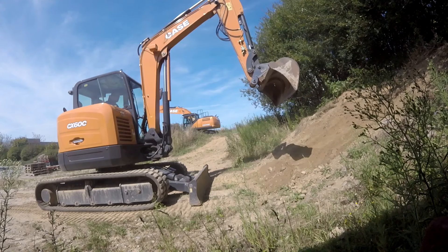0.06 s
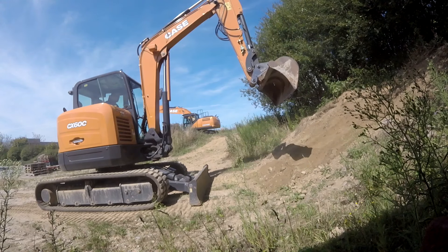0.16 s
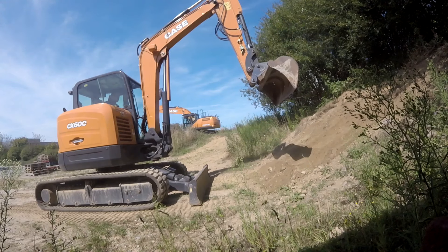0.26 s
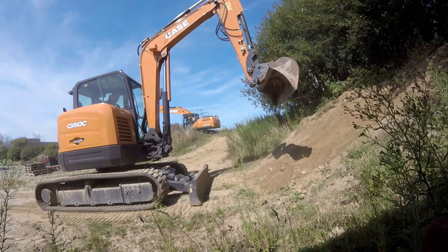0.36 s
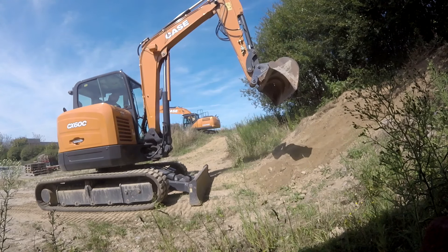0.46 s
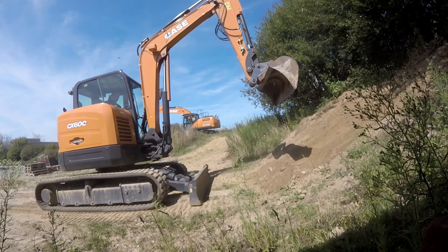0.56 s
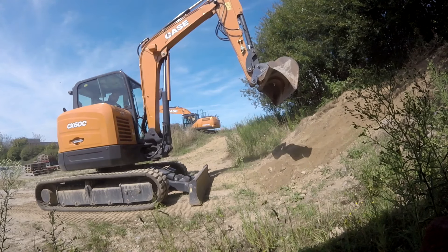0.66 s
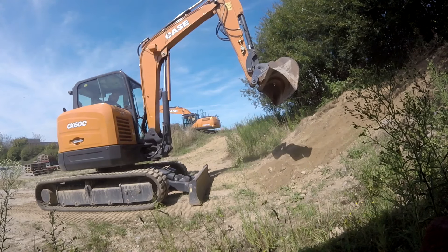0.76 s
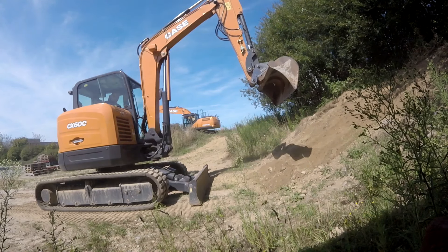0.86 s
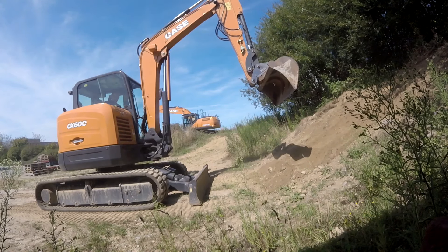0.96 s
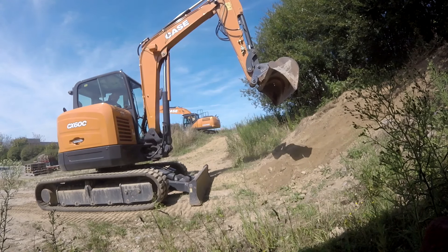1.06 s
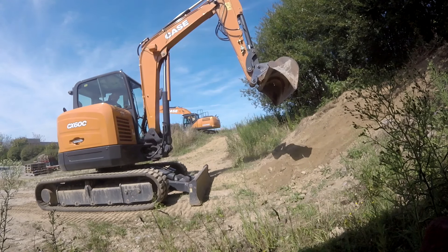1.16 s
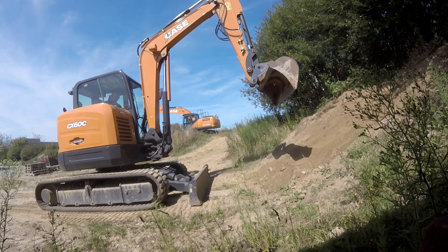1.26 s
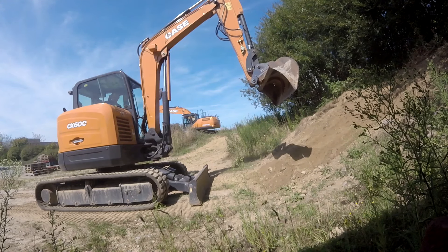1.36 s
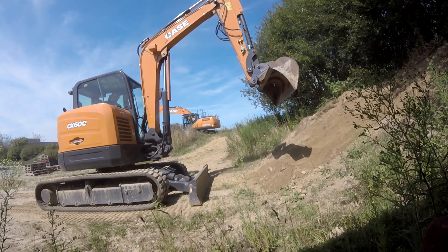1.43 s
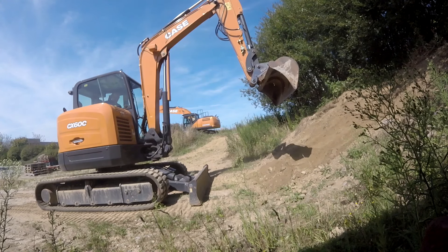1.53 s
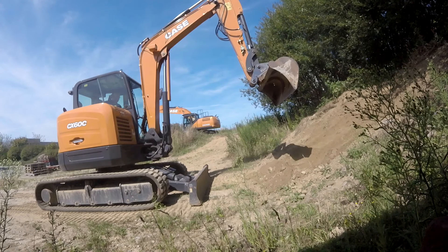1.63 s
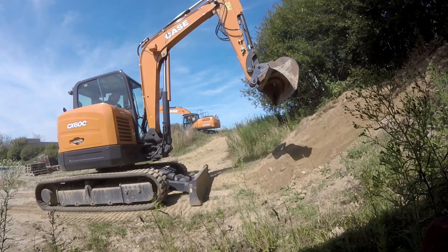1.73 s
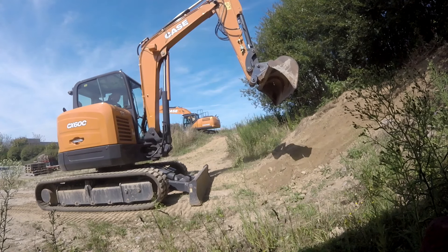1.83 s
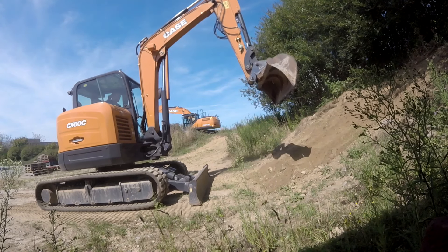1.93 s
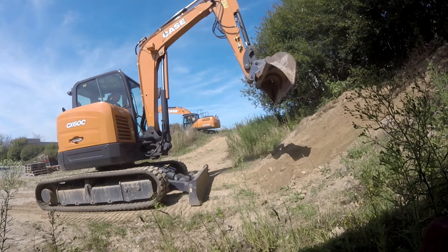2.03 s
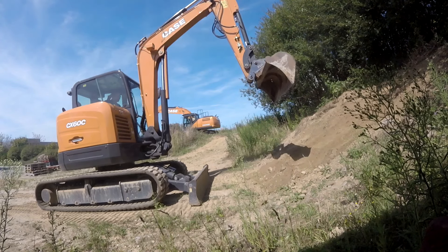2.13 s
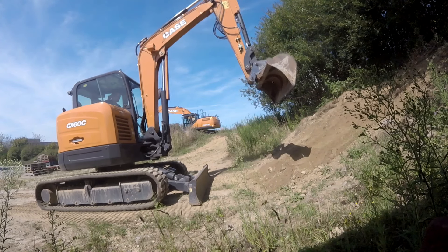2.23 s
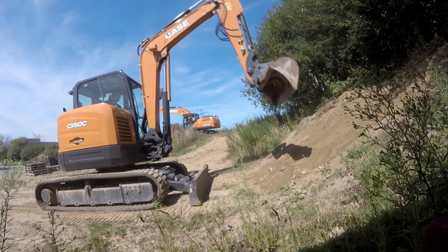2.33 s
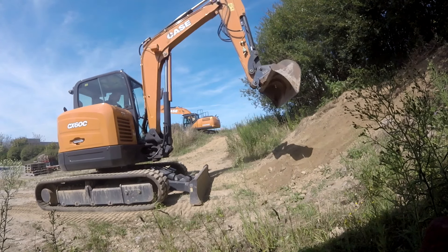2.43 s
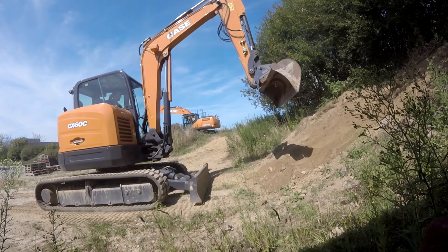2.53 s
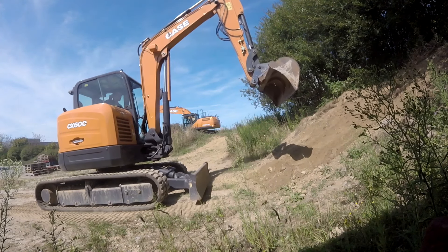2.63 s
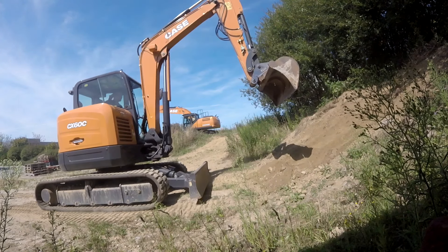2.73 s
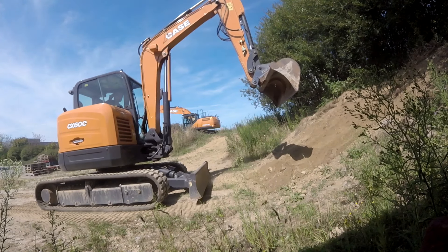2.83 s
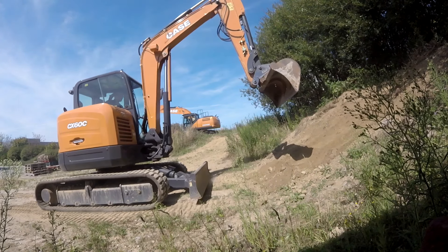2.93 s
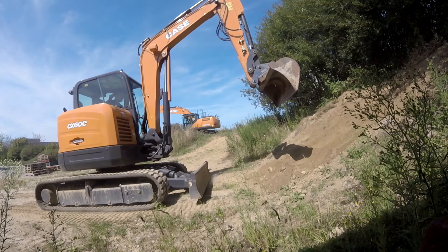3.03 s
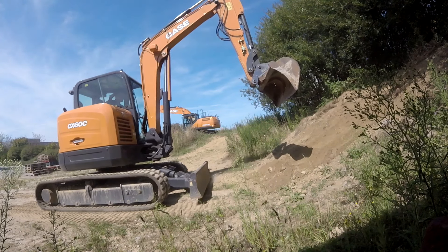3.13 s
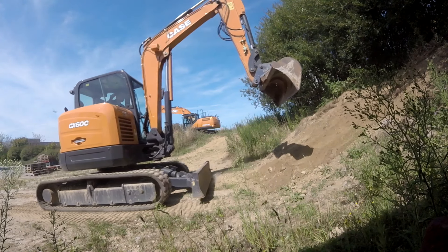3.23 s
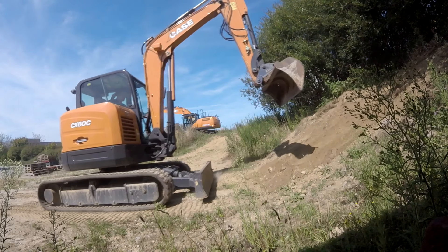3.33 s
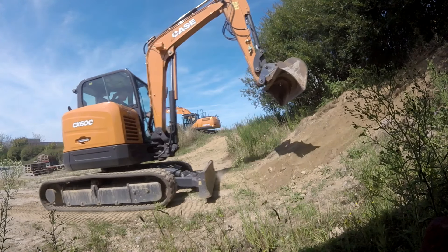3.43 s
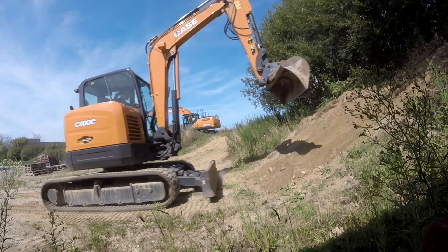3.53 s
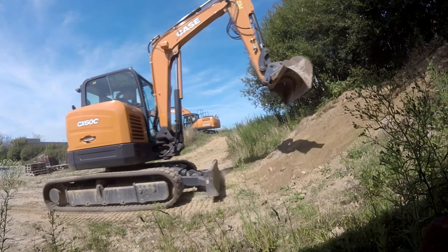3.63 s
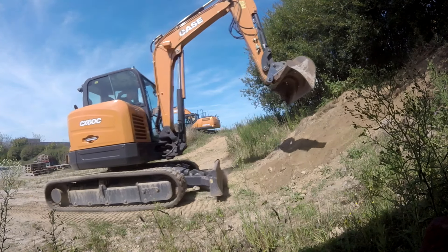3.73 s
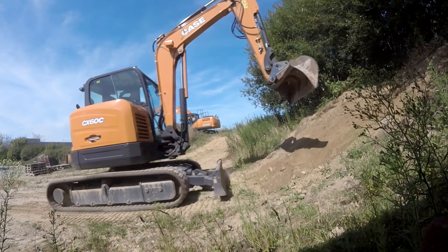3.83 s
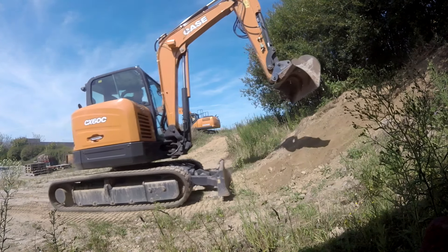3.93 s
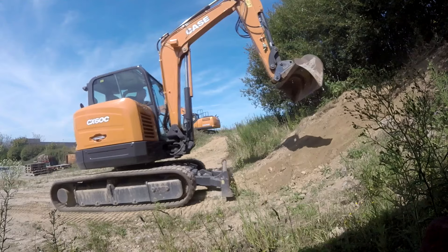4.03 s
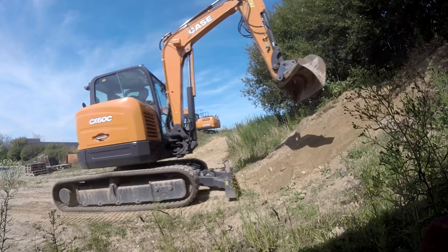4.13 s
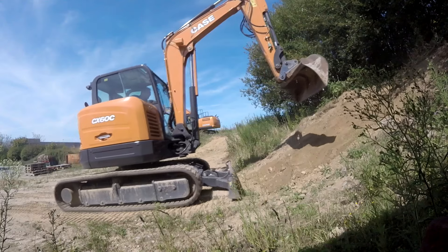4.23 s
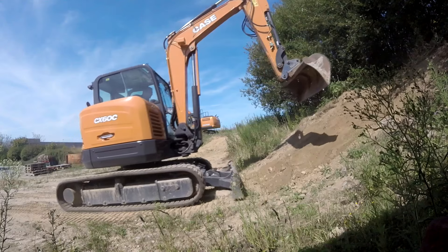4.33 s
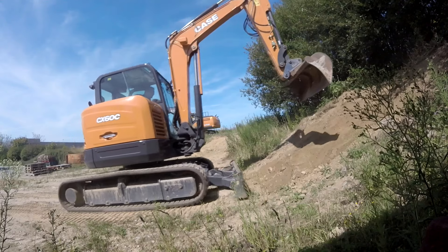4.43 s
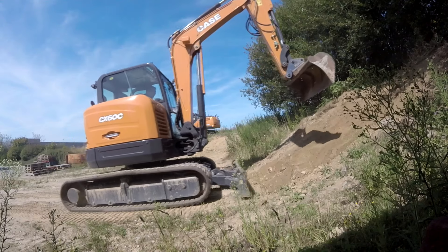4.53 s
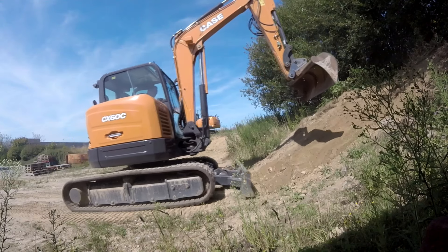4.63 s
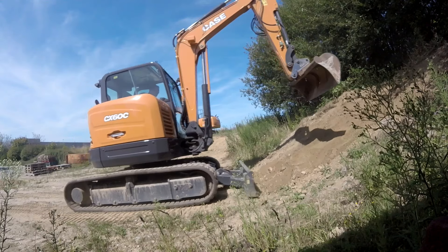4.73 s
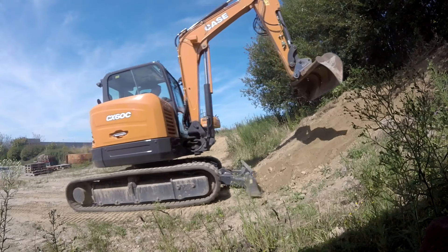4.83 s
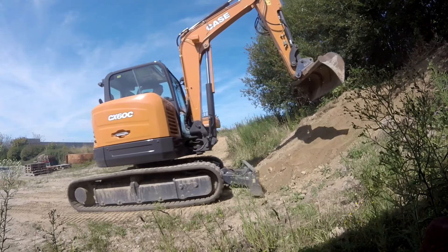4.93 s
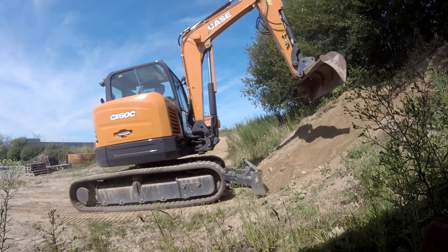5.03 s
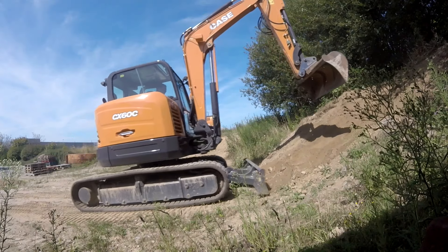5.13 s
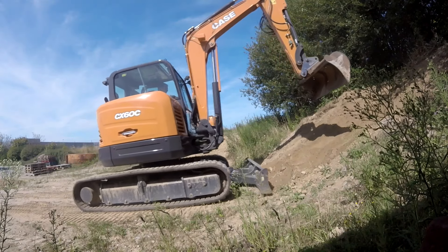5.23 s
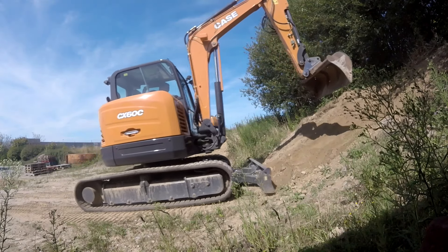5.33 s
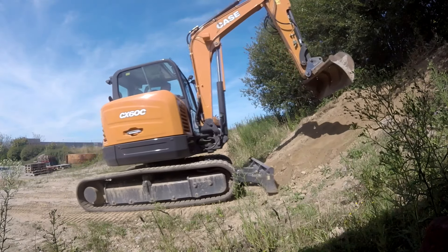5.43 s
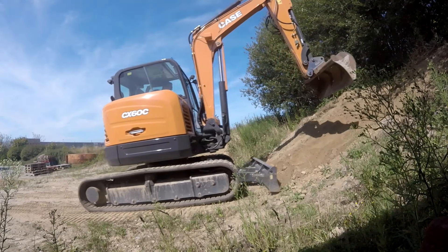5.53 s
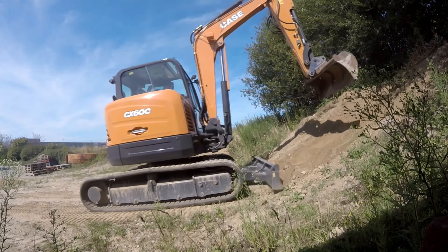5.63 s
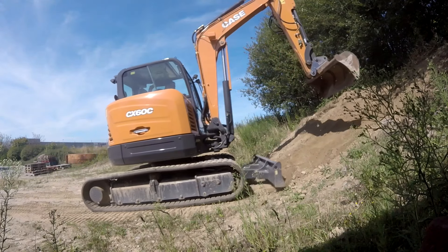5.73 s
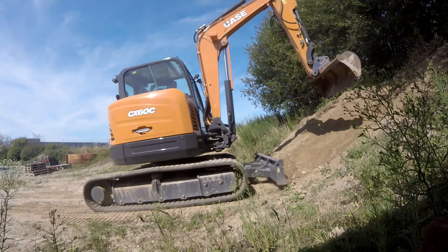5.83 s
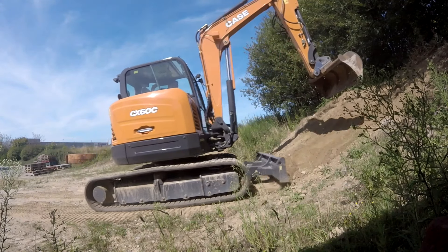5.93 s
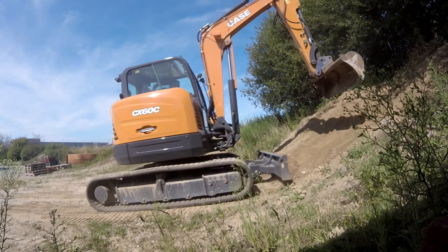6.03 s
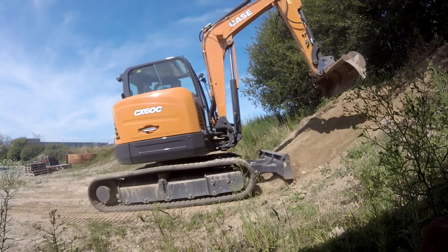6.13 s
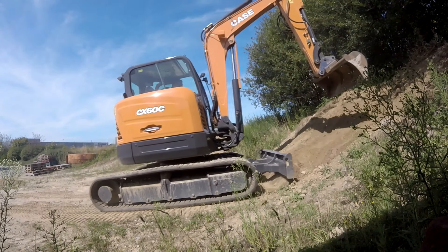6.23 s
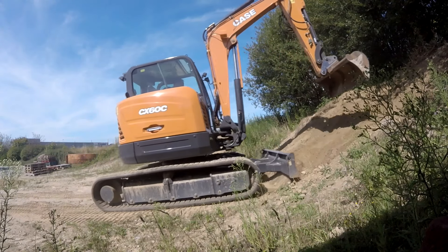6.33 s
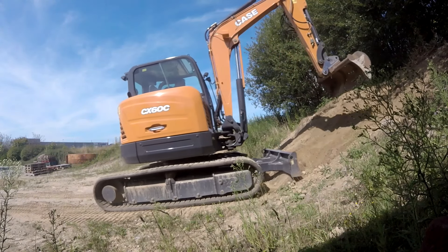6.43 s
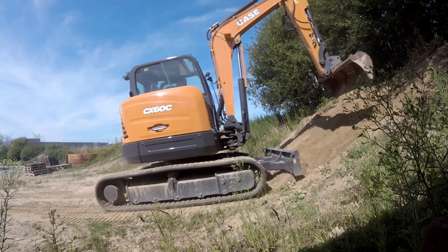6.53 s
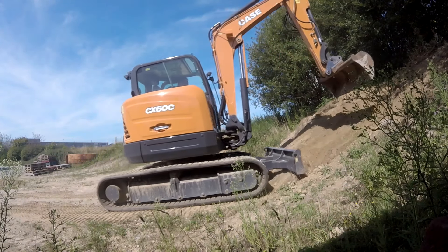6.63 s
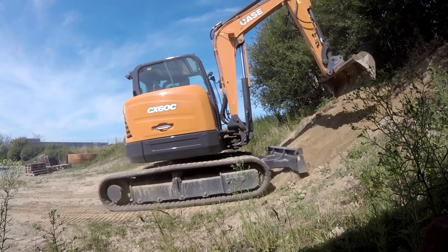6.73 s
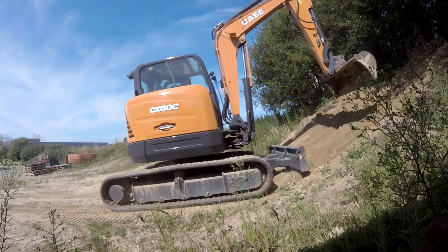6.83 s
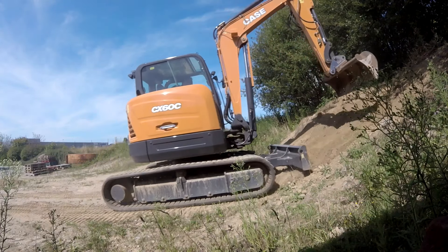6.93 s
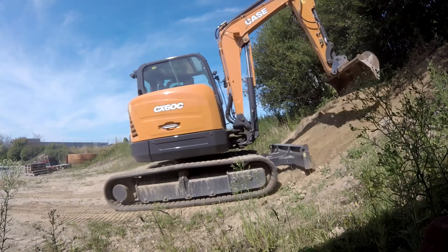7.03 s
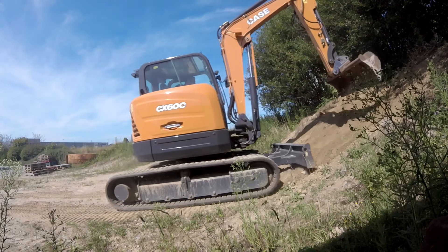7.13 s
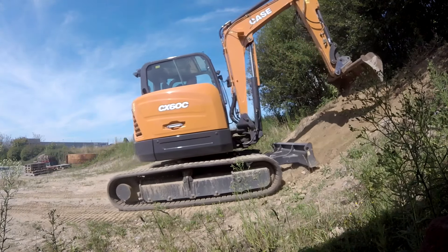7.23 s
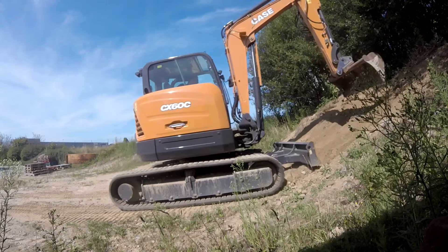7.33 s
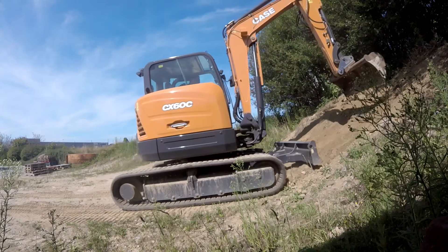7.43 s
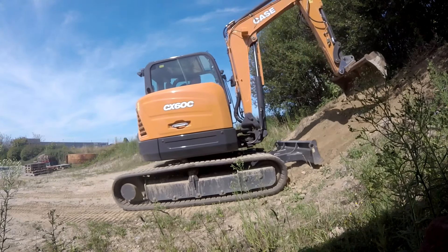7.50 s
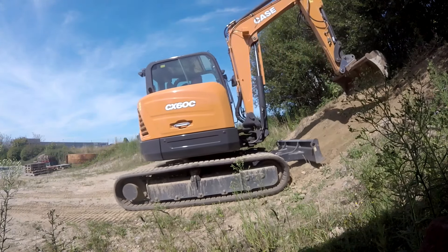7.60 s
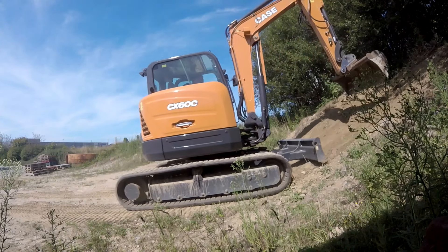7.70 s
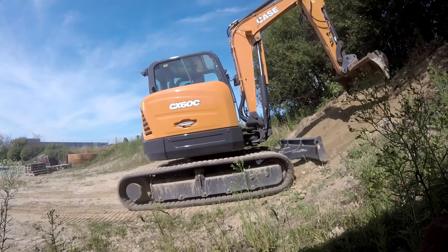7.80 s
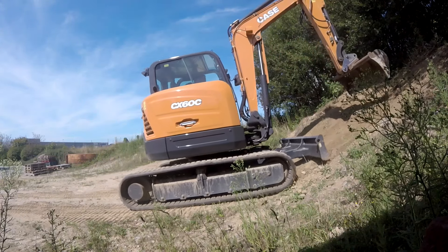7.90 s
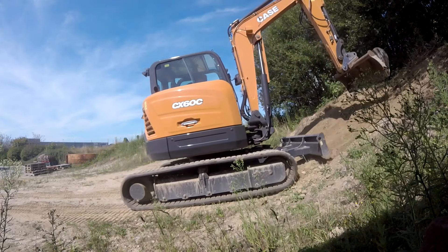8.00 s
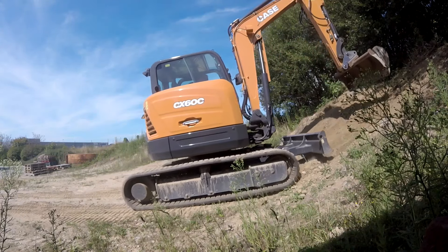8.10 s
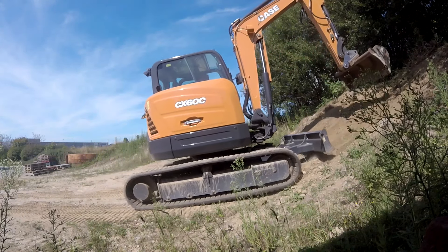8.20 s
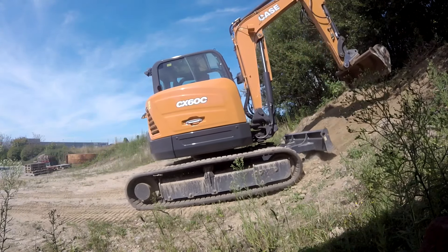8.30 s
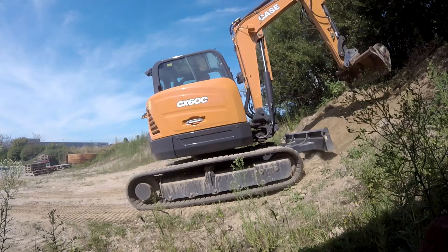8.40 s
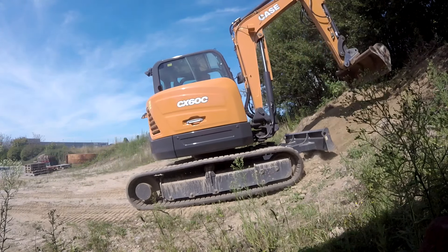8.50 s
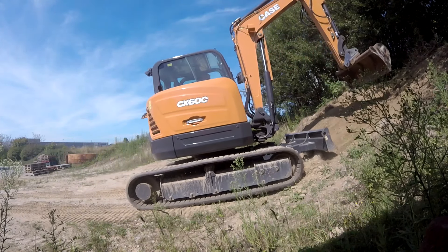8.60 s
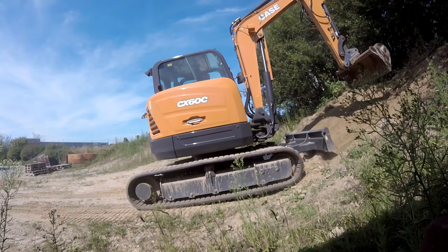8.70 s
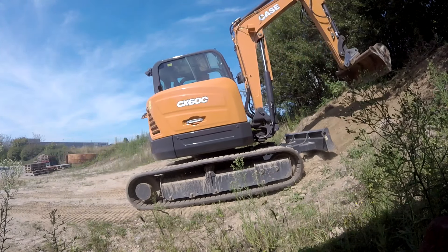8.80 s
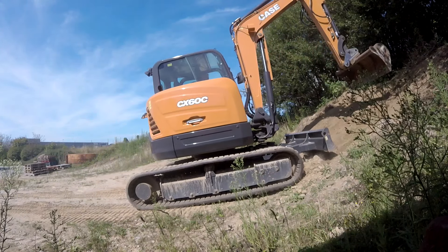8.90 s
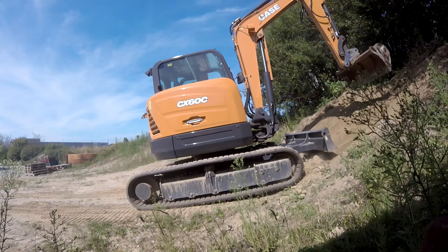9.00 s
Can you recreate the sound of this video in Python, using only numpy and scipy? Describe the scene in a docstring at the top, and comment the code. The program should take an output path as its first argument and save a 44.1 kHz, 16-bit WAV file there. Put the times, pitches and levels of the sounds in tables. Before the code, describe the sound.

Outdoors, a mini digger idles, speeds up and drives off, its tracks drumming and clattering over the engine's hum and knock.

```python
"""A mini excavator's four-cylinder diesel idles in the open, its exhaust humming and its block knocking.
At about 2 seconds it speeds up, and a nudge of the travel lever makes the tracks clunk.
Just after 3 seconds the engine sags, then takes the load as the machine crawls up a bank: oil hisses
through the valves, the pump whines, rubber tracks drum and boom on the hollow frame, and steel links
clank over the sprockets. After 8 seconds the tracks quieten and the pump's whine swells briefly."""
import sys
import numpy as np
from scipy import signal
from scipy.fft import rfft, irfft
from scipy.io import wavfile

SR = 44100
rng = np.random.default_rng(int(sys.argv[2]) if len(sys.argv) > 2 else 0)


def digitize_waveform(pressure):
    """Quantize a signal to 16-bit integers and store it at the path in sys.argv[1].

    Rows of a 2-D input are taken as channels; values are limited to [-1, 1].
    """
    field = np.atleast_2d(pressure).T
    bounded = np.clip(field, -1, 1)
    quanta = np.round(bounded * 32767).astype(np.int16)
    wavfile.write(sys.argv[1], SR, quanta)


N = 399546
T = np.arange(N) / SR
FREQS = np.arange(N // 2 + 1) * SR / N


def gain(db):
    """Turn decibels into a number to multiply by."""
    return np.exp(np.asarray(db) * (np.log(10) / 20))


def unit(x):
    """Scale a sound to an average (rms) level of 1."""
    return x / np.sqrt(np.mean(x ** 2))


def curves(table):
    """Join the rows of a table with straight lines in time, one curve per value column."""
    times, *columns = np.transpose(table)
    return [np.interp(T, times, column) for column in columns]


def bursts(rows):
    """A loudness curve with one short, smooth bump per row."""
    return sum(gain(db) * np.exp(-((T - peak) / width) ** 2) for peak, db, width in rows)


def noise():
    """White noise."""
    return rng.standard_normal(N)


def drift(rate):
    """A smooth random wobble of size about 1, changing about rate times a second."""
    step = int(SR / rate)
    levels = rng.standard_normal(N // step + 3)
    along = np.arange(step) / step
    blend = np.array([(1 - along) ** 2 / 2, .5 + along * (1 - along), along ** 2 / 2])
    neighbours = np.column_stack([levels[:-2], levels[1:-1], levels[2:]])
    return unit((neighbours @ blend).ravel()[:N])


def colour(x, points):
    """Shape a sound's bass and treble, fading out below the first point; the result has level 1."""
    hz, db = np.transpose(points)
    outline = gain(np.interp(np.log(FREQS + 1), np.log(hz), db))
    bass_cut = np.minimum(FREQS / hz[0], 1) ** 2
    return unit(irfft(rfft(x) * outline * bass_cut, N))


def resonate(x, rings):
    """Keep only the pitches at which an object rings; the result has level 1."""
    f = FREQS + 1
    peaks = sum(gain(db) / (1 + (hz / width * (f / hz - hz / f)) ** 2) for hz, width, db in rings)
    return unit(irfft(rfft(x) * peaks, N))


def blows(rows, phases, rise, fall, stretch, sag_hz_per_s=0):
    """Rings that swell and fade, harder ones more slowly. The real part is the sound, abs its loudness."""
    out = np.zeros(N, complex)
    usual_db = np.mean(rows, axis=0)[2]
    for (peak, hz, db), phase in zip(rows, phases):
        life = fall * gain(stretch * (db - usual_db))
        near = slice(max(int((peak - 3 * rise) * SR), 0), int((peak + 7 * life) * SR) + 1)
        age = T[near] - peak
        swell = np.exp(-np.where(age < 0, (age / rise) ** 2, age / life))
        cycles = hz * age - sag_hz_per_s * rise ** 2 * np.log(np.cosh(age / rise))
        out[near] += gain(db) * swell * np.exp(2j * np.pi * (cycles + phase))
    return out


# Lever pushes: a nudge, then the climb. Each row: start and end in seconds, oil flow in dB.
LEVER_PUSHES = [(2.3, 2.51, -1.5), (3.13, 8.34, 0)]


def flow(attack, release):
    """Oil flow follows the lever: it builds for attack seconds, holds, then fades over release seconds."""
    return sum(gain(db) * np.clip((T - start) / attack, 0, 1) * np.exp(-np.maximum(T - end, 0) / release)
               for start, end, db in LEVER_PUSHES)


def climb_seconds():
    """Time since the climb began."""
    return np.maximum(T - LEVER_PUSHES[-1][0], 0)


# Tone of the open air. Each row: frequency in Hz, relative level in dB.
AIR_TONE = [(20, -1.5), (35, 0), (70, -5), (110, -9), (2000, -65)]


def outdoor_air():
    """A low, steady rumble behind everything."""
    return colour(noise(), AIR_TONE) * gain(-34.5)


# Cooling fan and gear tones. Each row: multiple of the firing rate, level in dB.
FAN_TONES = [(8, -59), (9, -60), (15, -56), (16.5, -54.5), (20, -56), (22, -57), (30, -66)]


def fan(firings, waver_db=2):
    """Faint wavering tones that follow the engine's shaft."""
    return sum(gain(db + waver_db * drift(12)) * np.sqrt(2) * np.sin(2 * np.pi * multiple * firings)
               for multiple, db in FAN_TONES)


# How the fuel injectors ring. Each row: pitch in Hz, width in Hz, relative level in dB.
INJECTOR_RINGS = [(3450, 160, 3), (6060, 160, 0.5), (6390, 200, -1), (6650, 330, -4), (7330, 390, -4.5)]
# The ticking grows under load. Each row: time in seconds, level in dB.
TICK_LEVELS = [(2.9, -74), (3.22, -54), (3.6, -60.5), (5.4, -62.5), (5.8, -57), (9.06, -61)]
# Each injector's relative level in dB, in firing order.
INJECTOR_DB = [-0.5, -5.5, -1, -0.5]


def injectors(firings, scatter_db=2.2):
    """An injector gives a short, bright tick at every firing; the four are not equally loud."""
    count = firings.astype(int)
    scatter = scatter_db * rng.standard_normal(count[-1] + 1)[count]
    db = np.array(INJECTOR_DB)[count % len(INJECTOR_DB)] + scatter
    pulses = unit(gain(db) * np.exp(-((firings % 1 - .5) / .25) ** 2))
    return resonate(noise(), INJECTOR_RINGS) * pulses * gain(curves(TICK_LEVELS)[0])


# The pump's whine. Each row: time in seconds, relative level in dB.
WHINE_LEVELS = [(0, -50.5), (4.6, -45), (5, -41), (6.2, -47.5), (8.5, -49), (8.76, -40), (8.98, -37),
                (9.06, -51)]


def pump(firing_hz, firings, housing_hz=593, reach_hz=34, waver_db=2.5):
    """An overtone of the shaft whines when it comes near the pitch at which the pump housing rings."""
    whine = 0
    for multiple in (10, 11):
        phase = 2 * np.pi * multiple * firings
        nearness = 1 / (1 + ((multiple * firing_hz - housing_hz) / reach_hz) ** 4)
        tone = np.sin(phase) * gain(waver_db * drift(14))
        octave = np.sin(2 * phase) * gain(-14 + waver_db * drift(20))
        whine += nearness * (tone + octave)
    return whine * gain(curves(WHINE_LEVELS)[0])


# Tone of oil in the hoses, and of the short spits. Each row: frequency in Hz, relative level in dB.
OIL_TONE = [(1200, -3), (2200, 1), (2700, 0), (3500, 4.5), (4200, -4.5), (5600, -12), (6050, -4),
            (7400, -15), (8200, -22), (12500, -36.5)]
SPIT_TONE = [(1500, 6), (3500, 6.5), (5000, -2.5), (7000, -1.5), (10000, -18), (13000, -30)]
# How the oil pipes ring. Each row: pitch in Hz, width in Hz, relative level in dB.
PIPE_RINGS = [(2250, 220, -3.5), (2997, 96, -1), (3524, 86, 6), (3797, 75, 0.5)]
# Short, bright spits of hiss; the one at 3.21 seconds is a louder injector tick.
# Each row: time in seconds, level in dB, half-length in seconds.
BRIGHT_SPITS = [(1.932, -43, 0.017), (3.21, -46, 0.066), (3.45, -43, 0.028), (4.714, -44, 0.032)]


def hydraulics(firings, over_idle_hz, speed_db_per_hz=0.67, climb_db_per_s=0.66):
    """Oil hisses and rings the pipes, throbbing with the engine, beside short spits and a faint whistle."""
    # the valves stay open once the climb has begun
    valves = np.maximum(flow(attack=0.11, release=.25), T > LEVER_PUSHES[-1][1])
    circulating = gain(-56.5 + speed_db_per_hz * over_idle_hz)
    motors = gain(-50.5 + climb_db_per_s * climb_seconds()) * valves  # louder as the bank steepens
    throb = 1 - 0.43 * np.cos(2 * np.pi * firings)
    hiss = gain(-2 + 1.5 * drift(30)) * colour(noise(), OIL_TONE)
    pipes = resonate(noise(), PIPE_RINGS) * gain(-6 + 2.5 * drift(25))
    spits = colour(noise(), SPIT_TONE) * bursts(BRIGHT_SPITS)
    whistle = gain(-80) * np.sqrt(2) * np.sin(2 * np.pi * 9651 * T)
    return (hiss + pipes) * throb * np.hypot(circulating, motors) + spits + whistle


# Tone of the engine block and bonnet. Each row: frequency in Hz, relative level in dB.
BLOCK_TONE = [(100, 10), (220, 5), (330, 3.5), (520, -1), (880, 3), (1000, -0.5), (1195, 3.5), (1280, -1),
              (1380, -3.5), (1900, -11.5), (2200, -8), (2340, -6.5), (2520, -11.5), (3500, -12),
              (4100, -17.5), (7000, -23.5), (12500, -38)]


def knock(firings, over_idle_hz, idle_db=-37.5, speed_db_per_hz=0.27, repeat_share=0.24, scatter_db=3):
    """Each firing rattles the block; part of the clatter repeats with every turn of the shaft."""
    one_turn = rng.standard_normal(1600)
    repeating = one_turn[(firings / 2 % 1 * len(one_turn)).astype(int)]  # two firings per turn
    strength = gain(scatter_db * rng.standard_normal(int(firings[-1]) + 1))[firings.astype(int)]
    pulses = 2.7 + strength * np.exp(-(firings % 1) / 0.67)  # kicks on top of a steady clatter
    clatter = np.sqrt(repeat_share) * repeating + np.sqrt(1 - repeat_share) * noise()
    return colour(pulses * clatter, BLOCK_TONE) * gain(idle_db + speed_db_per_hz * over_idle_hz)


# What the silencer lets through. Each row: frequency in Hz, boost or cut in dB.
SILENCER_TONE = [(27, -19), (55, 1.5), (80, -16), (110, -6), (164, -10.5), (186, -24.5), (213, -31.5),
                 (238, -12.5), (268, -13), (282, -23), (320, -29), (430, -50)]


def exhaust(firing_hz, firings, uneven_db=-11):
    """The firings hum through the silencer; unequal cylinders add tones halfway between the overtones."""
    hz, pass_db = np.transpose(SILENCER_TONE)
    waver_db = 1.1 + 1.5 * flow(attack=0.12, release=0.52)  # wavers more under load
    hum = 0
    for halves in range(1, 17):
        multiple = halves / 2
        db = np.interp(multiple * firing_hz, hz, pass_db) + uneven_db * (halves % 2)
        hum += gain(db + waver_db * drift(18)) * np.sqrt(2) * np.cos(2 * np.pi * multiple * firings)
    return hum


# The engine idles, speeds up, sags as the drive engages, then holds working speed.
# Each row: time in seconds, firings per second, exhaust level in dB before the silencer.
ENGINE_RUN = [(0, 58.45, -31), (.22, 53.1, -27.5), (.45, 53.25, -26), (1.4, 53.26, -25),
              (1.85, 53.23, -24.5), (1.96, 54.25, -22), (2.15, 56.54, -24), (2.29, 56.9, -26),
              (2.6, 56.37, -25), (2.83, 56.5, -24), (3.02, 57.81, -32), (3.11, 53, -32),
              (3.16, 50.43, -23.5), (3.27, 53, -23), (3.48, 59.47, -22), (5.3, 59.17, -21),
              (5.9, 58.38, -22), (8.55, 58.73, -25), (8.76, 60.5, -27), (9.06, 59.6, -29)]


def engine(idle_hz=53.3):
    """One shaft sets the pace for the diesel's own sounds and for the oil it pumps."""
    firing_hz, exhaust_db = curves(ENGINE_RUN)
    firings = np.cumsum(firing_hz) / SR  # how many firings so far
    over_idle_hz = firing_hz - idle_hz
    hum = exhaust(firing_hz, firings) * gain(exhaust_db)
    diesel = hum + knock(firings, over_idle_hz) + fan(firings) + injectors(firings)
    return diesel + hydraulics(firings, over_idle_hz) + pump(firing_hz, firings)


# The frame's hollow boom. Each row: time in seconds, relative level in dB.
BOOM_LEVELS = [(2.1, -42), (2.5, -34), (3.1, -43), (3.65, -20), (3.95, -25.5), (4.85, -19.5), (5.35, -12),
               (6.15, -17.5), (6.7, -27.5), (7.02, -15), (7.45, -29.5), (8.05, -16.5), (8.3, -13),
               (8.6, -20), (9.06, -40)]


def frame_boom(boom_hz=83.96, shudder_hz=51.4, shudder_db=-25.5):
    """The hollow frame booms, and its deep shudder beats against the exhaust hum."""
    boom = np.sqrt(2) * np.sin(2 * np.pi * boom_hz * T + 0.15 * drift(3.8))
    boom += 0.2 * resonate(noise(), [(89.4, 2.0, 0)])
    shudder = np.sqrt(2) * np.sin(2 * np.pi * shudder_hz * T + 0.15 * drift(8))
    sway = gain(-3) * resonate(noise(), [(39.7, 9.5, -1), (45.6, 43, 0)])
    shaking = gain(shudder_db) * flow(attack=0.49, release=0.66)
    return boom * gain(curves(BOOM_LEVELS)[0] - 1) + (shudder + sway) * shaking


# How a track pin rings. Each row: pitch in Hz, width in Hz, relative level in dB.
PIN_RING = [(2180, 480, 0)]
# Tone of a clunk. Each row: frequency in Hz, relative level in dB.
CLUNK_TONE = [(300, 0.5), (500, 2), (750, 2), (1200, 10), (1450, -2.5), (1750, -11), (2300, -12),
              (3500, -16), (9000, -53)]
# The clicks and the clunks. Each row: time in seconds, level in dB, half-length in seconds.
CLICK_HITS = [(3.72, -35, .007), (3.866, -33.5, .007)]
CLUNK_HITS = [(2.411, -31, .011), (2.44, -28, 0.023), (6.345, -32.5, 0.017), (7.23, -31, 0.017),
              (7.41, -31.5, .018), (8.553, -37, .02)]


def pins_and_slack():
    """Track pins click brightly, and slack track jerks tight with a rattly clunk."""
    clicks = resonate(noise(), PIN_RING) * bursts(CLICK_HITS)
    clunks = colour(noise(), CLUNK_TONE) * bursts(CLUNK_HITS)
    return clicks + clunks


# How the steel links ring. Each row: pitch in Hz, width in Hz, relative level in dB.
LINK_RINGS = [(302, 100, -0.5), (665, 126, 3.5), (737, 40, -2.5), (911, 85, 1.5), (1051, 75, 3.5),
              (1170, 110, 5), (1412, 33, -4.5), (1539, 98, -3), (2280, 450, -11.5)]
# A link snaps onto the sprocket. Each row: time in seconds, relative level in dB.
LINK_CLANKS = [(2.636, -33), (3.393, -31), (3.429, -29.5), (3.544, -31), (3.583, -28), (3.63, -29),
               (3.685, -27), (3.721, -26.5), (3.77, -31), (3.832, -30), (3.868, -34.5), (3.968, -31),
               (4.014, -33), (4.117, -28.5), (4.155, -33.5), (4.259, -30), (4.301, -29), (4.423, -28),
               (4.521, -28), (4.575, -34), (4.681, -32), (4.836, -32.5), (5.048, -32.5), (5.08, -33),
               (5.23, -28.5), (5.257, -29.5), (5.405, -29), (5.44, -29.5), (5.504, -33), (5.535, -34),
               (5.605, -32), (5.627, -32), (5.709, -29), (5.902, -29.5), (6.045, -31.5), (6.123, -28.5),
               (6.223, -31), (6.284, -33.5), (6.338, -31), (6.548, -28), (6.753, -29), (6.907, -27),
               (6.937, -25), (6.981, -27), (7.143, -29.5), (7.216, -33), (7.318, -27.5), (7.384, -28.5),
               (7.414, -25.5), (7.484, -33), (7.652, -31), (7.875, -33), (8.037, -30), (8.268, -31),
               (8.54, -33.5)]


def struck_links(contact_hz=1110, cut_db_per_octave=16, detune=0.014):
    """A blow starts all of a link's pitches at once, most strongly those near contact_hz."""
    times, db = np.transpose(LINK_CLANKS)
    pitches, _, ring_db = np.transpose(LINK_RINGS)
    share = gain(ring_db - cut_db_per_octave * np.abs(np.log2(pitches / contact_hz)))
    phases = rng.random(len(times))
    rings = []
    for hz in pitches:
        link_hz = hz * (1 + detune * rng.standard_normal(len(times)))  # no two links are quite alike
        hits = np.column_stack([times, link_hz, db])
        rings.append(blows(hits, phases, rise=0.0042, fall=0.015, stretch=.2))
    return share @ rings / np.linalg.norm(share)


def rattling_links(rattle_db=-38, fade_db_per_s=0.4, scuff=0.3):
    """Loose links rattle as the track runs, and clank onto the sprocket with a chattering ring."""
    rattle = gain(rattle_db - fade_db_per_s * climb_seconds()) * flow(attack=0.24, release=0.34)
    clanks = gain(0.5) * struck_links()
    force = np.hypot(rattle * gain(drift(45)), scuff * np.abs(clanks))
    chatter = np.real(clanks * np.exp(0.45j * drift(400)))  # a fast wobble roughens the ring
    grit = noise() * gain(2.5 * drift(700))
    return resonate(grit, LINK_RINGS) * force + chatter


# How the track frame rings. Each row: pitch in Hz, width in Hz, relative level in dB.
FRAME_RINGS = [(94, 21, 2), (149.5, 8.1, -14.5), (171.4, 22, -12.5), (200, 27, -9), (234.2, 15.6, -1),
               (258.9, 14.4, 1), (287.2, 14, -9)]
# Rubber lugs jolt over the rollers. Each row: time in seconds, pitch in Hz, relative level in dB.
LUG_JOLTS = [(2.47, 251.5, -28.5), (3.235, 247, -17), (3.29, 243, -19), (3.35, 238.7, -17),
             (3.515, 242, -11), (3.64, 236, -12), (3.818, 245.7, -18.5), (3.917, 244.8, -18.5),
             (4.123, 249.5, -17.5), (4.273, 244.4, -17), (4.432, 255.5, -20), (4.645, 253.6, -14.5),
             (4.705, 222, -18), (4.864, 248, -20), (5.065, 260.5, -17.5), (5.2, 266.6, -18.5),
             (5.262, 240.1, -11.5), (5.51, 241, -15), (5.725, 246.5, -19.5), (5.925, 266, -18),
             (5.978, 238.6, -14), (6.348, 251, -18), (6.42, 243.6, -16), (6.622, 245, -21),
             (6.75, 249.3, -18.5), (6.841, 237.3, -17.5), (6.92, 245.2, -22), (7.154, 245.3, -21),
             (7.494, 242.5, -23.5), (7.656, 254, -22), (7.795, 250, -28), (8.06, 231.8, -13),
             (8.185, 266.4, -14), (8.363, 275, -23.5)]


def drumming_tracks(rolling_db=-25.5, rest_db=-39.5, fade_db_per_s=1, pressure_on_s=1.633, scuff=0.46):
    """Lugs drum on the hollow frame: each jolt swells and drops in pitch above the rumble of rolling."""
    phases = rng.random(len(LUG_JOLTS))
    jolts = gain(1) * blows(LUG_JOLTS, phases, rise=0.034, fall=0.04, stretch=0.19, sag_hz_per_s=340)
    # once the oil is under pressure, the frame trembles even at a standstill
    tremble = gain(rest_db) * np.clip((T - pressure_on_s) / 0.52, 0, 1)
    # the rolling gets quieter as the machine climbs away
    rolling = gain(rolling_db - fade_db_per_s * climb_seconds()) * flow(attack=0.16, release=0.12)
    rumble = np.hypot(tremble, rolling) * gain(2.5 * drift(25))
    force = np.hypot(rumble, scuff * np.abs(jolts))
    ring = resonate(noise(), FRAME_RINGS)
    swells = np.abs(signal.hilbert(ring))
    even_ring = unit(ring / (swells + 0.35) ** .45)  # soften chance swells so the force sets the level
    thumps = np.real(jolts * np.exp(.25j * drift(70)))
    return even_ring * force + thumps


def scene():
    """The engine, tracks and frame sound together over the outdoor rumble."""
    machine = engine() + drumming_tracks() + rattling_links() + pins_and_slack() + frame_boom()
    return (machine + outdoor_air())[None]


def record(dry):
    """Cut away the highest treble, above 12600 Hz."""
    return signal.sosfilt(signal.ellip(8, .2, 70, 12600, fs=SR, output="sos"), dry)


dry = scene()
out = record(dry)
digitize_waveform(out)
```